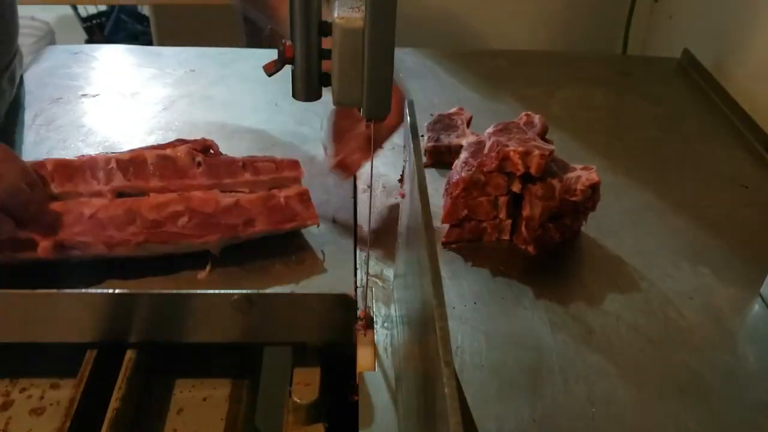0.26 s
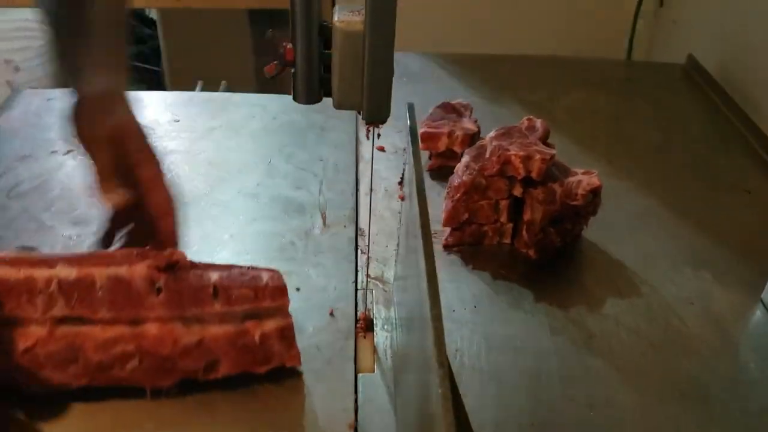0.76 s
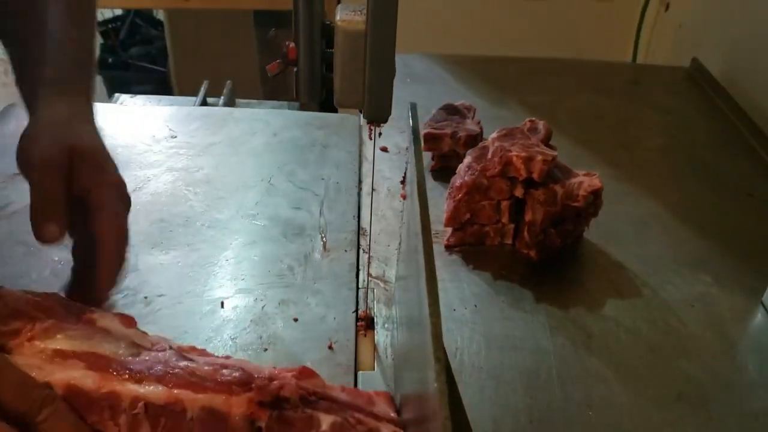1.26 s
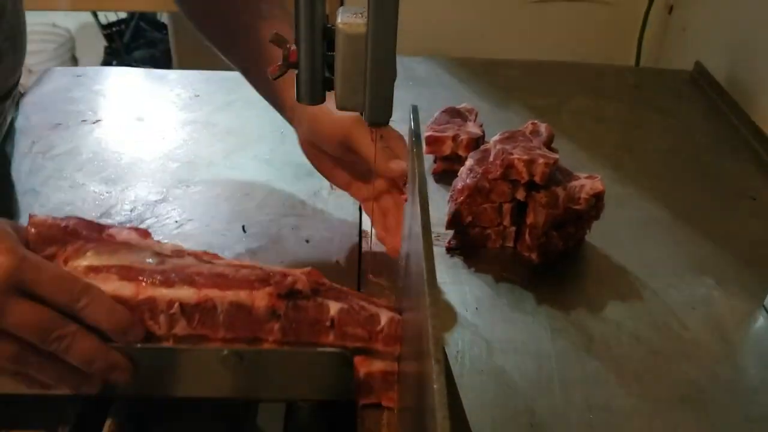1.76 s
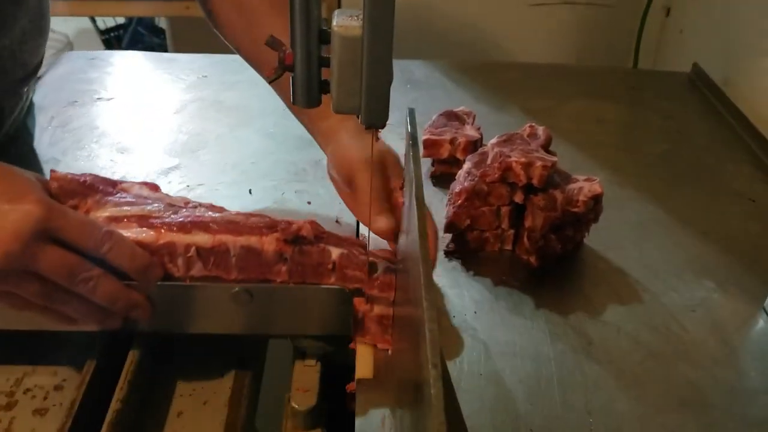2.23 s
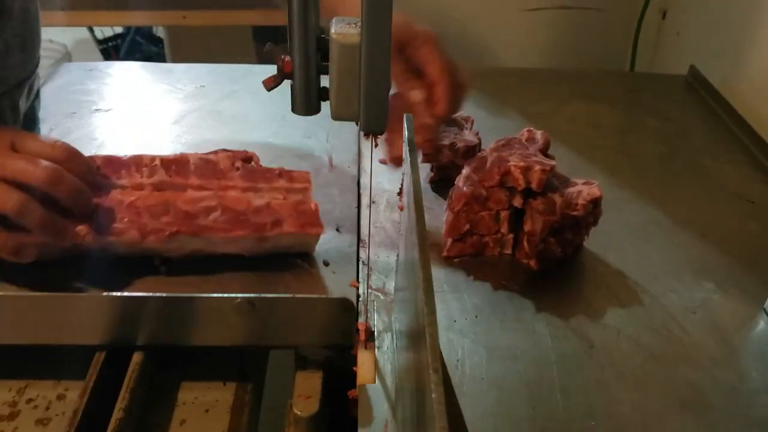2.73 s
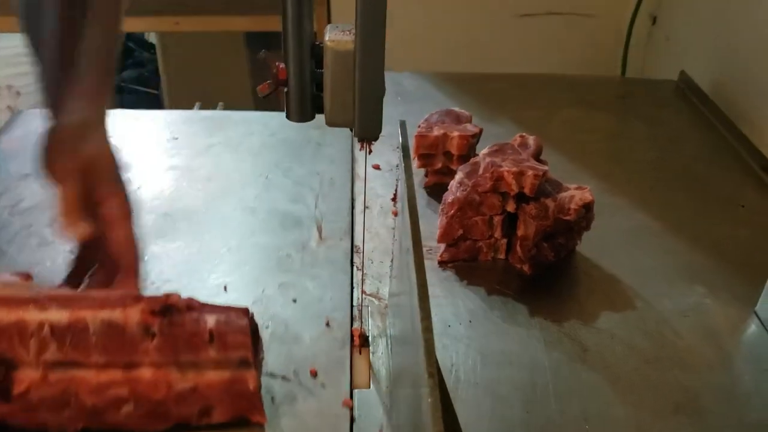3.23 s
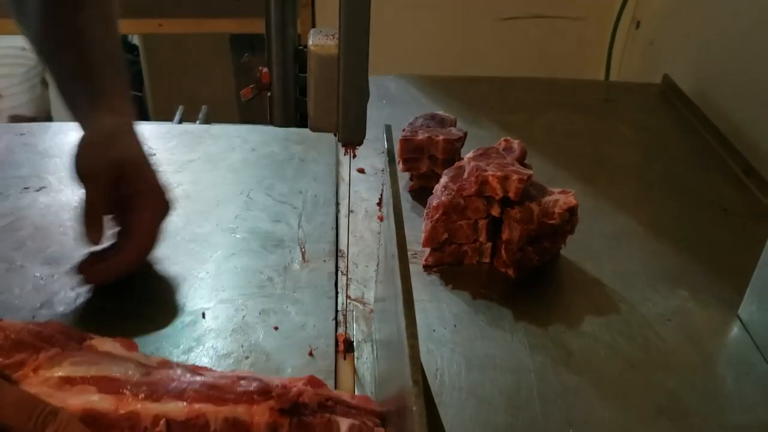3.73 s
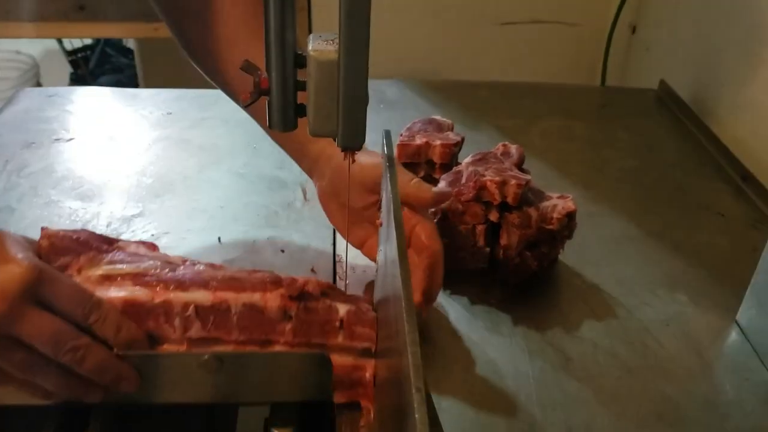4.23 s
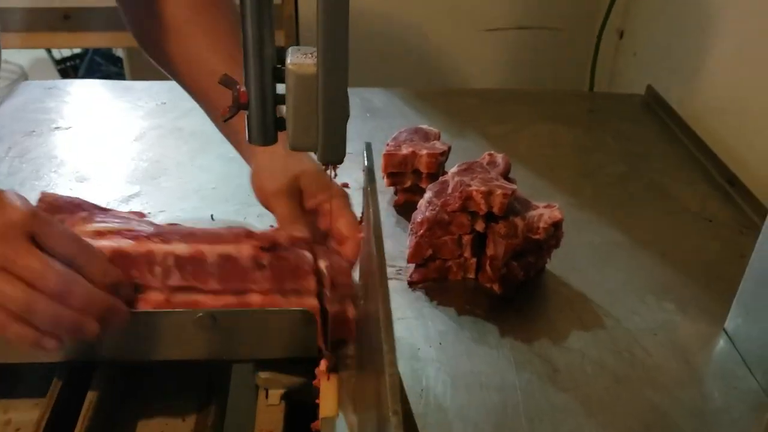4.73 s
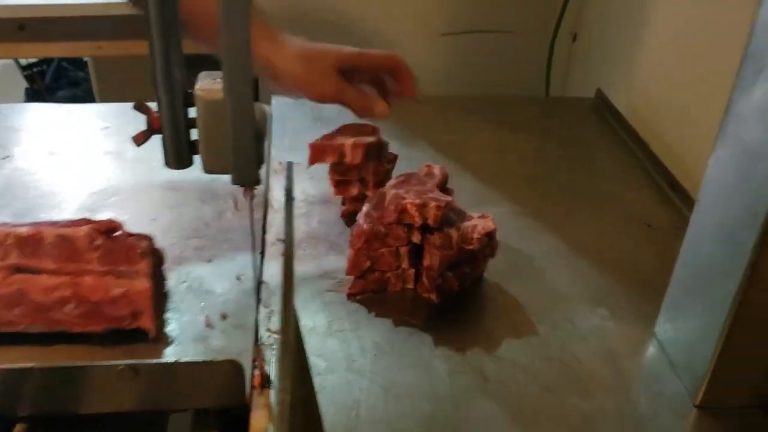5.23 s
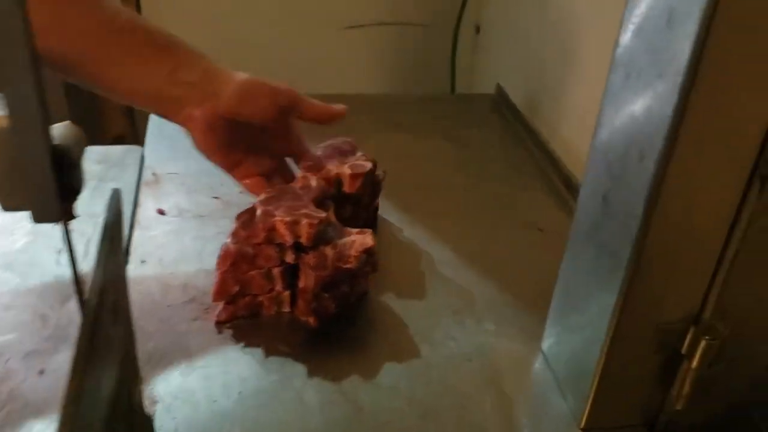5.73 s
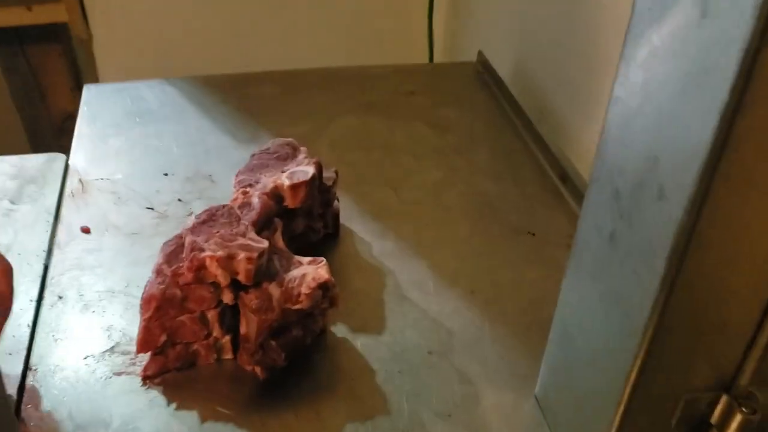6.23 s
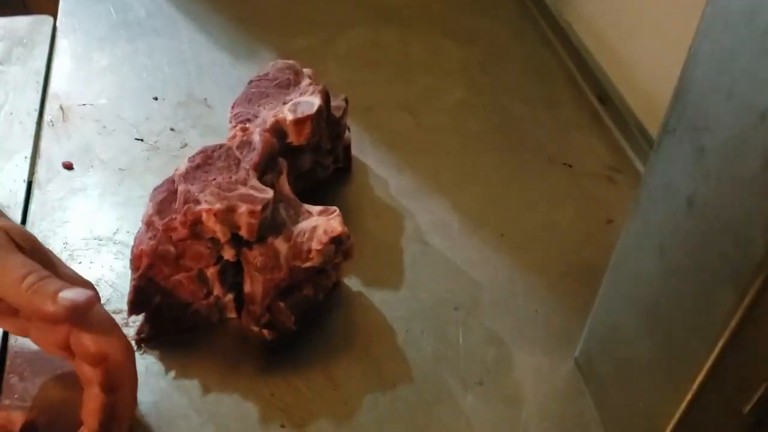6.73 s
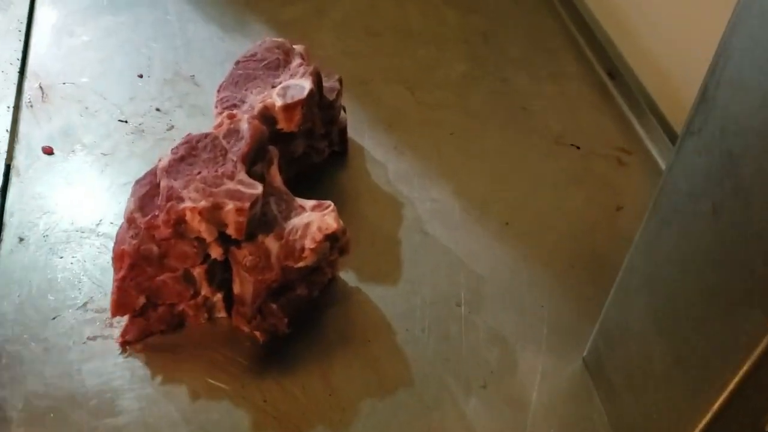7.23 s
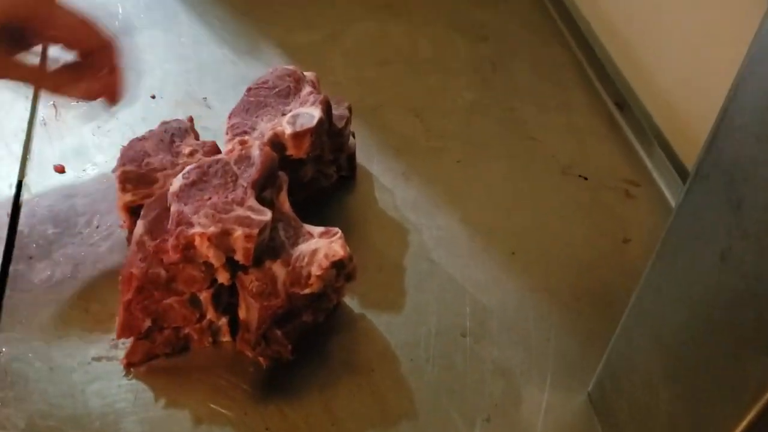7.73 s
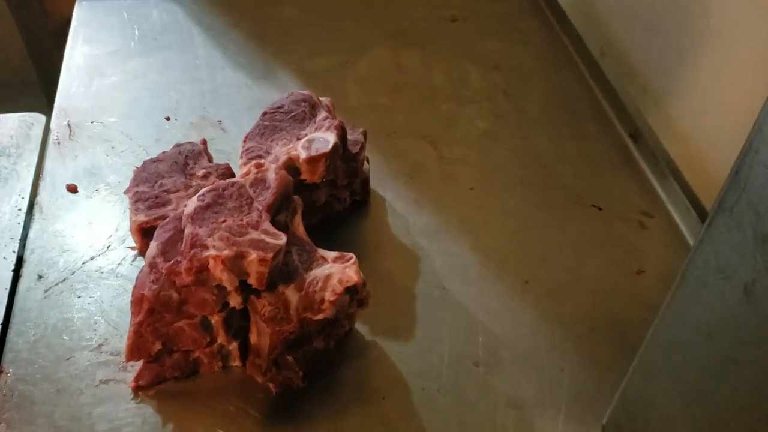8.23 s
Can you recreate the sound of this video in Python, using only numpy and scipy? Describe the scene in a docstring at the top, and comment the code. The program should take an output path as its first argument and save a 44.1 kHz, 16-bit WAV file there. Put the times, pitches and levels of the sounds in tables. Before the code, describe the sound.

A meat band saw is already running in a hard-walled butchery room, recovering from a dip at the start. Its low hum near 120 hertz throbs quickly with the wheel, beneath a resonant frame and table drone, broad blade hiss and fine treble fizz. From about 1.7 to 2.45 seconds ribs pass through: a harsh, rough whine swells with gritty bone rasp, peaks around 2.1, wavers and stops. The drone sags, then climbs back. A second, louder cut runs from 4.1 to 4.7, strongest near 4.5. Around 6 the saw seems nearer and its guide noise brighter. The third cut spans 6.5 to 7.1, with a tiny bright tick at 6.6 and a shriller, more piercing finish. The machine drops noticeably, then slowly recovers until the end at 8.5. Close stereo microphone; the cuts' treble leans left, with short, dense metallic reflections.

```python
"""First a meat band saw idles in a hard-walled butchery room, its sound climbing back from a dip.
The hum throbs with the wheel as summed sines; frame, table, blade hiss, fizz and guide are coloured noise.
Three times a rack of ribs is pushed through: teeth sing in partials of their bite rate and noise rasps
in the bone. The idling sound dips at each cut and climbs back. It is heard by a stereo microphone."""
import sys
import numpy as np
from scipy import signal
from scipy.fft import rfft, irfft, next_fast_len
from scipy.io import wavfile

SR = 44100
rng = np.random.default_rng(int(sys.argv[2]) if len(sys.argv) > 2 else 0)


def master(y):
    """Save y as 16-bit WAV."""
    cut = np.clip(np.atleast_2d(y).T, -1, 1)
    pcm = np.round(cut * 32767)  # scale
    wavfile.write(sys.argv[1], SR, pcm.astype(np.int16))


N = 373950
TIME = np.arange(N) / SR
SIDES = np.array([[.5], [-.5]])   # shares a left-minus-right difference between the two channels
PORT_LAG_S = 0.0001987   # the left port of the microphone hears the machine's noise first
LOAD_DB = -26   # level of the high song that counts as a loaded blade
TREBLE_PAN_DB = (3.5, 10)   # left minus right, from entry to exit of a cut

# frame and table resonances: (centre [Hz], width [Hz], lift [dB])
FRAME = [(73, 6, 13), (93, 6, 5), (159, 4.1, 11), (286, 12.3, 9), (309, 5.6, 12), (341, 12.3, 14.5),
         (462, 30, 4.5), (628, 22, -8), (685, 24.5, 7.5), (833, 17, 5.5), (982, 13.6, 8), (6720, 27, 11),
         (7470, 170, 7.5)]
# the listener drifts about the machine: (time [s], level before each layer's share [dB])
NEARNESS = [(0, -1), (.1, -.3), (.85, 0), (1.1, 1.5), (1.27, -.5), (2.5, .3), (3.2, .5), (3.5, 1.5),
            (4.45, -1.3), (4.9, 1.3), (5.45, 1), (6.02, 4.5), (6.71, 1), (6.85, -5.3), (8.48, -4.3)]
# the listener turns aside: (time [s], blade guide [dB], second hum partial [dB], fourth hum partial [dB],
# lift of the blade fizz [dB])
TURN = [(0, -63, -53, -60, 0), (4.6, -59, -53, -56, 0), (5.5, -49, -45, -48, -.5), (6, -43, -42, -50, 2),
        (6.6, -39, -41, -36, 5), (6.9, -51, -48, -42, 0), (7.4, -51, -47, -48, 0),
        (7.75, -50.5, -47, -43, .5), (8.48, -49, -47, -43.5, 2.5)]
# the idling sound dips at the start and at each cut: (deepest at [s], depth before each layer's share [dB],
# climb time constant [s], dip of the hum [dB], lift of the frame rumble [dB])
DIPS = [(0.02, 7, 1.45, 4, 1), (2.48, 6.5, 1.6, 5.5, 3), (4.82, 6, 2, 3, 6), (7.05, 10, 4.3, 9, 5)]


def from_db(db):
    """Decibels to gain."""
    return 10 ** (np.asarray(db) / 20)


def rms_one(x):
    """Scale to unit rms."""
    return x / np.sqrt(np.mean(np.abs(x) ** 2) + 1e-20)


def in_time(rows):
    """Columns of a curve table, sample by sample."""
    s, *columns = np.transpose(rows)
    return [np.interp(TIME, s, c) for c in columns]


def through(rows, ends):
    """A value that moves evenly from the entry to the exit of a cut."""
    return np.interp(TIME, [rows[0][0], rows[-1][0]], ends)


def at_hz(points, hz):
    """Read a (frequency, value) table on a log frequency axis."""
    points = np.array(points)
    return np.interp(np.log(hz), np.log(points[:, 0]), points[:, 1])


def drift(rate_hz, shape=(), size=N):
    """Slow chance: noise twice through a one-pole low-pass, rms 1, each value held for 8 samples."""
    r = np.exp(-2 * np.pi * rate_hz * 8 / SR)
    noise = rng.standard_normal(shape + (size // 8 + 4001,))
    slow = signal.lfilter([1], [1, -2 * r, r * r], noise)[..., 4000:]   # past the filter's start
    return np.repeat(rms_one(slow), 8, axis=-1)[..., :size]


def rise_and_die(peak_s, rise_s, fall_s):
    """Rises straight to 1, then dies away exponentially."""
    since = TIME - peak_s
    return np.where(since < 0, np.clip(1 + since / rise_s, 0, 1), np.exp(-np.maximum(since, 0) / fall_s))


def layer_level(level_db, near_share, dip_share):
    """Level in dB of an idling layer as the listener drifts; it dips at each cut and climbs back."""
    near_db, = in_time(NEARNESS)
    dip_db = np.max([db * rise_and_die(s, .41, climb_s) for s, db, climb_s, *_ in DIPS], axis=0)
    return level_db + near_share * near_db - dip_share * dip_db


def machine_noise(spectrum, modes, low_hz, high_hz):
    """Stereo noise with a colour and resonances; rms 1 between low_hz and high_hz before the balance."""
    # how alike the two channels are: (frequency [Hz], left-right correlation [-1 to 1])
    likeness = [(30, .6), (60, 0.97), (180, 0.87), (300, .85), (600, 0.71), (1200, 0.28), (5000, -0.085),
                (15000, 0.17)]
    # balance of the noise: (frequency [Hz], left minus right [dB])
    noise_balance = [(60, 0), (180, 0.5), (550, 2.5), (1650, 2.0), (4970, 0.5), (15000, 4)]
    size = next_fast_len(N)
    hz = np.maximum(np.arange(size // 2 + 1) * SR / size, 1)
    colour = from_db(at_hz(spectrum, hz))
    for top_hz, width_hz, top_db in modes:
        colour = colour * (1 + (from_db(top_db) - 1) / (1 + (2 * (hz - top_hz) / width_hz) ** 2))
    in_band = (hz > low_hz) & (hz < high_hz)
    colour = colour / np.sqrt(2 * np.sum(colour[in_band] ** 2) / size)
    mid, side = rfft(rng.standard_normal((2, size))) * colour
    alike = np.clip(at_hz(likeness, hz), -1, 1)
    pair = np.sqrt((1 + alike) / 2) * mid + np.sqrt((1 - alike) / 2) * side * 2 * SIDES
    balance = from_db(at_hz(noise_balance, hz) * SIDES)
    lead = np.exp(2j * np.pi * hz * PORT_LAG_S * SIDES)
    return irfft(pair * balance * lead, size)[:, :N]


def frame_rumble():
    """Frame resonances coloured into low noise; the rumble swells before each cut's end and fades."""
    # (frequency [Hz], relative level [dB per Hz])
    spectrum = [(15, -65), (25, -42), (64, -13), (87, -19), (118, -6.5), (147, -11.5), (179, -12),
                (343, -24), (403, -22.5), (600, -23), (780, -51), (1320, -120)]
    lead_s, rise_s, fall_s = 0.3, 0.88, 0.41
    shake_db = sum(db * rise_and_die(s - lead_s, rise_s, fall_s) for s, *_, db in DIPS)
    level_db = layer_level(-39.5, near_share=.8, dip_share=.21) + shake_db + 1.55 * drift(8.6)
    return from_db(level_db) * machine_noise(spectrum, FRAME, low_hz=128, high_hz=474)


def table_drone():
    """Middle noise through the frame and table resonances; it has the largest share of the dips."""
    # (frequency [Hz], relative level [dB per Hz])
    spectrum = [(300, -8), (450, -3), (700, -3), (1000, -5.5), (1200, -10.5), (1500, -18.5)]
    level_db = layer_level(-36.5, near_share=.27, dip_share=1.69) + 1.88 * drift(16.6)
    return from_db(level_db) * machine_noise(spectrum, FRAME, low_hz=490, high_hz=1070)


def blade_hiss():
    """The free-running blade: broad noise, also lifted by the resonances."""
    # (frequency [Hz], relative level [dB per Hz])
    spectrum = [(650, -27.5), (1100, -4.5), (1470, -5.5), (1590, -5), (2040, -5.5), (2280, -3),
                (2750, -6.5), (3610, -7), (5260, -7), (7220, -6.5), (8500, -24), (11000, -51),
                (18700, -120)]
    level_db = layer_level(-48, near_share=.41, dip_share=1) + 1.21 * drift(13.3)
    return from_db(level_db) * machine_noise(spectrum, FRAME, low_hz=1376, high_hz=1876)


def blade_fizz():
    """The top of the blade noise, lifted at times as the listener turns."""
    # (frequency [Hz], relative level [dB per Hz])
    spectrum = [(5000, -18.5), (8500, -17.5), (9040, -15), (10200, -5), (14500, 2.5), (15700, 0)]
    *_, lift_db = in_time(TURN)
    level_db = layer_level(-44, near_share=.14, dip_share=.48) + lift_db + 1.2 * drift(30.0)
    return from_db(level_db) * machine_noise(spectrum, [], low_hz=10000, high_hz=15300)


def blade_guide():
    """Flickering treble noise of the blade guide; its level follows the listener's turning."""
    # (frequency [Hz], relative level [dB per Hz])
    spectrum = [(4500, -23), (5500, 1.5), (6600, 1.5), (7500, -11), (10500, -25), (11100, -1), (12200, -6),
                (13200, -25)]
    guide_db, *_ = in_time(TURN)
    return from_db(guide_db + 2.0 * drift(50.0)) * machine_noise(spectrum, [], low_hz=4500, high_hz=13000)


def motor_hum():
    """Magnetic pull at twice the mains rate; the turning wheel adds side lines, so it throbs."""
    # (multiple of the hum [count], wheel turns added [count], level against its partial [dB])
    lines = [(1, 0, 0.5), (1, 1, -18.5), (2, 0, 1), (2, -1, -4), (2, 1, -12), (3, 0, -29), (4, 0, -5.5),
             (5, 0, -38)]
    hum_hz, wheel_hz, balance_db = 119.97, 14.9, .5   # balance: left minus right
    lead_s, fall_s, climb_s = 0.24, 0.11, 0.15   # the hum dips earlier and more briefly than the rest
    near_db, = in_time(NEARNESS)
    _, second_db, fourth_db, _ = in_time(TURN)
    dip_db = sum(db * rise_and_die(s - lead_s, fall_s, climb_s) for s, *_, db, _ in DIPS)
    odd_db = -23 + near_db - dip_db
    levels = {2: second_db + 1.2 * drift(0.95), 4: fourth_db}
    wander = 0.11 * drift(1.7)   # radians at the first partial
    heard = TIME + .5 * PORT_LAG_S * SIDES   # half the lag of the noise
    out = 0
    for multiple, turns, db in lines:
        multiple, turns = round(multiple), round(turns)
        hz = multiple * hum_hz + turns * wheel_hz
        phase = 2 * np.pi * hz * heard + multiple * wander + rng.uniform(0, 2 * np.pi)
        gain = from_db(levels.get(multiple, odd_db) + db + balance_db * SIDES)
        out = out + gain * np.sin(phase)
    return np.sqrt(2) * out


def idle():
    """Frame, table, blade and motor hum of the running saw."""
    return frame_rumble() + table_drone() + blade_hiss() + blade_fizz() + blade_guide() + motor_hum()


def touch():
    """A bone edge touches the blade: a short bright puff of noise."""
    at_s, level_db, decay_s, band_hz = 6.591, -19, .005, (2000, 7000)   # level before the band filter
    since = TIME - at_s
    shape = from_db(level_db) * (since > 0) * np.exp(-np.abs(since) / decay_s)
    band = signal.butter(2, band_hz, "band", fs=SR, output="sos")
    return shape * signal.sosfilt(band, rng.standard_normal((2, N)))


def rasp(rows):
    """Bone chips: fast-flickering bright noise that follows three quarters of the high song's swing."""
    # (frequency [Hz], relative level [dB per Hz])
    spectrum = [(900, -32), (1500, -20), (2800, -15), (4000, -10), (5200, -11), (7200, -4), (8600, -18),
                (11000, -7), (12300, -3), (13300, -8), (14400, 0), (15800, -1)]
    bite_db, bright_db, _ = in_time(rows)
    level_db = -40 + .75 * (bite_db + bright_db - LOAD_DB)
    pan_db = 0.49 * through(rows, TREBLE_PAN_DB) * SIDES
    chips = machine_noise(spectrum, [], low_hz=12000, high_hz=12380) * from_db(1.25 * drift(130.0))
    return from_db(level_db + pan_db) * chips


def scattered(x):
    """Steel table and guards scatter the cut: each ear has its own short burst of dying reflections."""
    t60_s = .16
    t = np.arange(round(t60_s * SR)) / SR
    paths = rng.standard_normal((2, len(t))) * from_db(-60 * t / t60_s)
    return signal.fftconvolve(x[None], paths, axes=1)[:, :len(x)]


def song(rows, tilt_db, third_db):
    """Teeth bite bone at an even rate; uneven bites and early or late teeth roughen all partials together."""
    # song of the teeth: (multiple of the tooth rate [count], relative level [dB])
    partials = [(1, 0), (2, -1), (3, 1), (4, -3.5), (5, -4), (6, 0), (7, -10), (8, -9), (9, -6.5),
                (10, -3.5), (11, -4.5), (12, -3), (13, 0)]
    # below the treble: (frequency [Hz], left minus right [dB])
    cut_balance = [(1000, 21), (2400, 1), (4400, 0.5), (7000, 2.5), (8500, -6)]
    teeth_hz, sag_hz, inertia_s = 1170, 12.5, .07   # free rate; slowing at full load; load time constant
    rough_light, rough_loaded = 3.5, .9   # unevenness of the bites in flesh and in bone
    a, b = round(rows[0][0] * SR), round(rows[-1][0] * SR)
    bite_db, bright_db, low_db = [c[a:b] for c in in_time(rows)]
    tone_db = through(rows, (-25, -15.5))[a:b]   # tooth tone against the bite
    pan_db = through(rows, TREBLE_PAN_DB)[a:b]

    hold = np.exp(-1 / (inertia_s * SR))
    push = from_db(bite_db + bright_db - LOAD_DB)
    load = np.tanh(signal.lfilter([1 - hold], [1, -hold], push))
    rate = teeth_hz - sag_hz * load
    late = .12 * drift(25.0, size=b - a) + .025 * drift(250.0, size=b - a)   # radians of the tooth period
    teeth = 2 * np.pi * np.cumsum(rate) / SR + late
    rough = rough_light + (rough_loaded - rough_light) * load
    uneven = drift(170.0, size=b - a)

    groups = [0, 0, 0, 0]   # tooth tone, low, middle and high song
    for multiple, db in partials:
        depth = rough * np.sqrt(min(multiple / 2.5, 1))   # lower partials are cleaner
        bite = (1 + depth * uneven) / np.sqrt(1 + depth ** 2)
        line = np.array([rms_one(ear) for ear in scattered(bite * np.cos(multiple * teeth))])
        group = int(np.searchsorted([1.5, 3.5, 7.5], multiple))
        pan = pan_db if group == 3 else at_hz(cut_balance, multiple * np.mean(rate))
        # each partial swells and fades on its own
        swell_db = 2.2 * drift(6.0, size=b - a)
        colour_db = third_db * (multiple == 3) + tilt_db * np.log2(max(multiple, 4))
        groups[group] = groups[group] + line * from_db(db + colour_db + swell_db + pan * SIDES)
    tone_db = tone_db + 3.5 * drift(12.0, size=b - a)   # the tooth tone comes and goes
    shares_db = tone_db, low_db, 0, bright_db
    out = np.zeros((2, N))
    out[:, a:b] = sum(from_db(bite_db + db) * rms_one(lines) for db, lines in zip(shares_db, groups))
    return out


def cuts():
    """The rasp of bone chips and the song of the teeth, faded in and out with each pass."""
    # one list a cut: (time [s], bite as level of the middle song [dB], high song against it [dB],
    # low song against it [dB])
    passes = [
        [(1.72, -47, -3, 4), (1.87, -34, -1.5, -7), (1.98, -28.5, -11, -14), (2.07, -24, 3.5, -5),
         (2.2, -26.5, 5, -7), (2.25, -31, 5, -0.5), (2.31, -37, -0.5, -2), (2.35, -25.5, -9, -7.5),
         (2.4, -49, -2, 2), (2.45, -56, -2, 0)],
        [(4.08, -50, -4, -3), (4.21, -38.5, 0, -4), (4.34, -26, -7.5, -8), (4.4, -21.5, -1, -8),
         (4.46, -19, 0, -7), (4.52, -23.5, 2.5, -2), (4.6, -27, 2.5, -11), (4.66, -38, -1.5, 2.5),
         (4.69, -47.5, 0, -1), (4.74, -52, -2, -2)],
        [(6.5, -43, -1, -11), (6.6, -31.5, -4.5, -4), (6.68, -22, -2, -10.5), (6.72, -26.5, -1, -2),
         (6.76, -25, 1.5, -8), (6.86, -30.5, 7.5, -8.5), (6.94, -34.5, 7.5, -8), (7.015, -32.5, 7, -4),
         (7.04, -41.5, -3, 2), (7.12, -64, -2, 0)],
    ]
    # one row a cut: (tilt of the upper partials [dB per octave], lift of the third partial [dB])
    colours = [(-2, 1), (-.1, 4), (5, -3)]
    fade_s = .043
    out = 0
    for rows, colour in zip(passes, colours):
        inside = np.clip(np.minimum(TIME - rows[0][0], rows[-1][0] - TIME) / fade_s, 0, 1)
        out = out + inside * (rasp(rows) + song(rows, *colour))
    return out


def scene():
    """The running saw, a touch of bone and the three cuts."""
    return idle() + touch() + cuts()


def record(dry):
    """The microphone chain rounds the peaks, then cuts the top steeply."""
    peak, cutoff_hz = 1.3, 15720
    rounded = peak * np.tanh(dry / peak)
    return signal.sosfilt(signal.ellip(13, .3, 75, cutoff_hz, fs=SR, output="sos"), rounded)


dry = scene()
out = record(dry)
master(out)
```